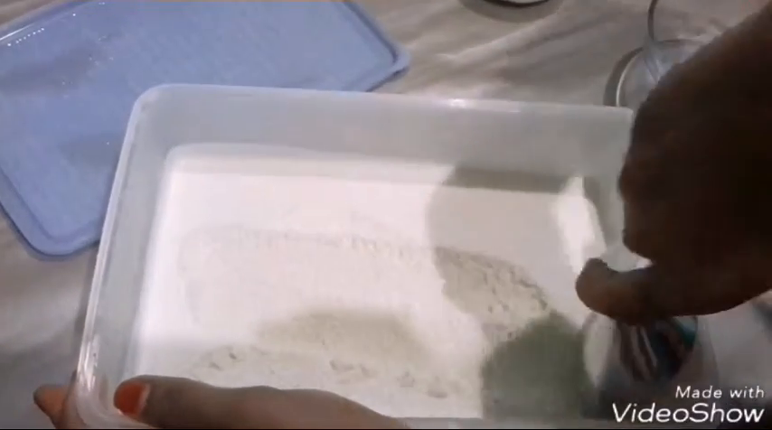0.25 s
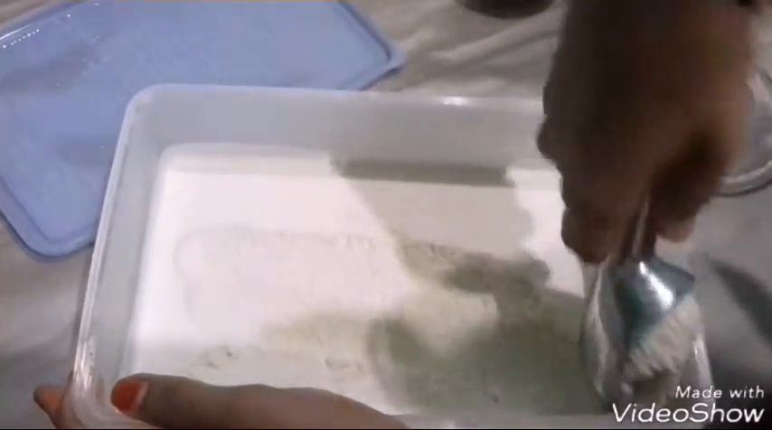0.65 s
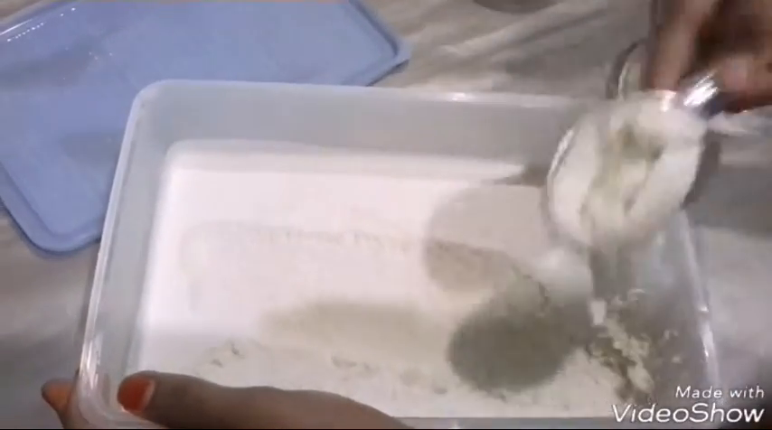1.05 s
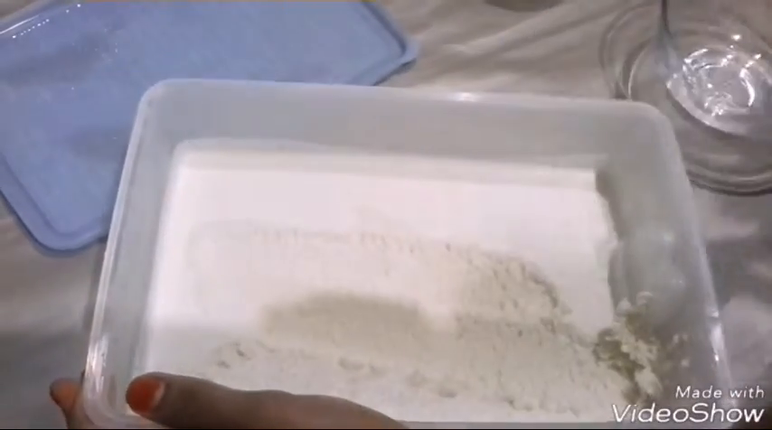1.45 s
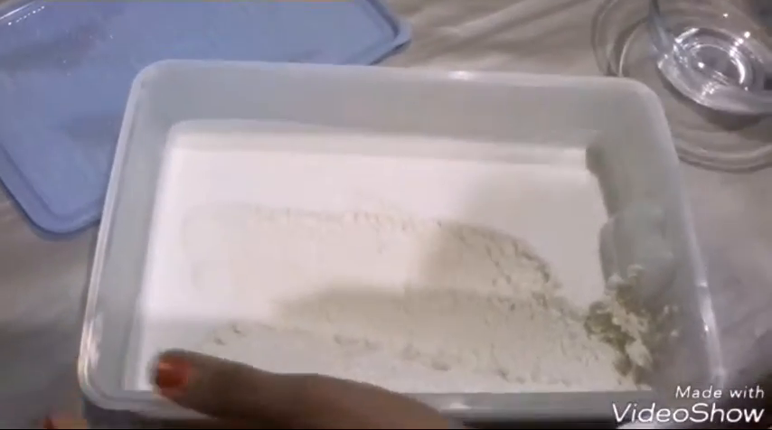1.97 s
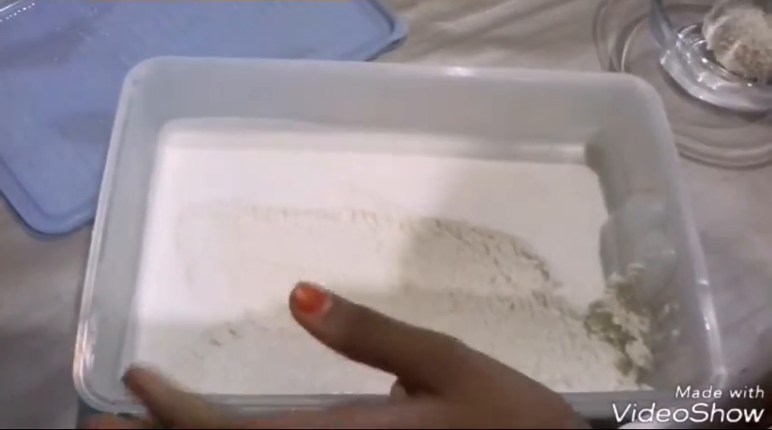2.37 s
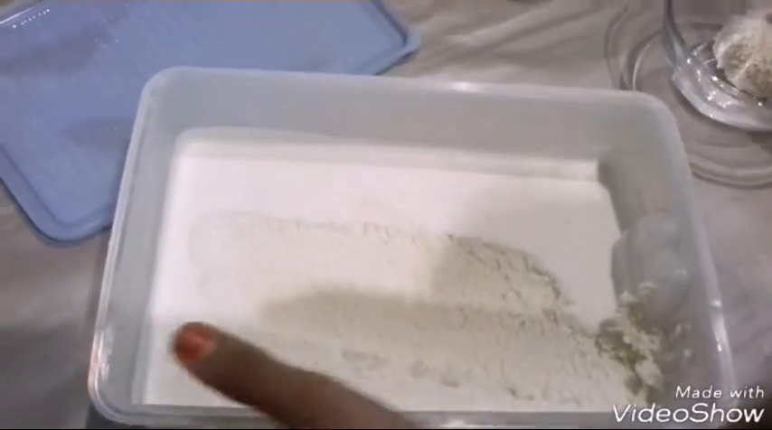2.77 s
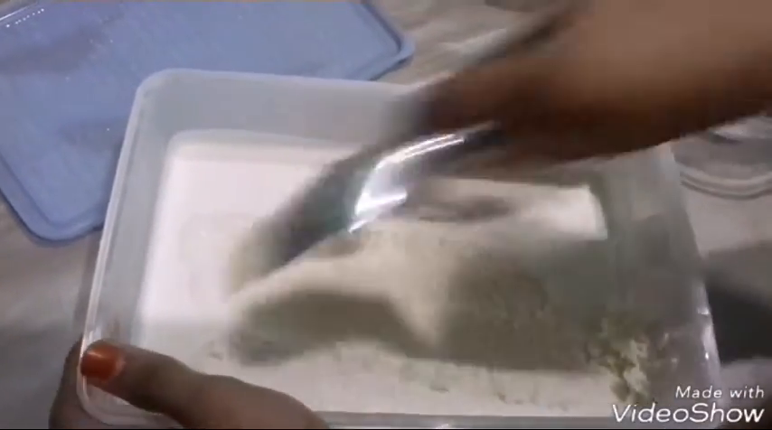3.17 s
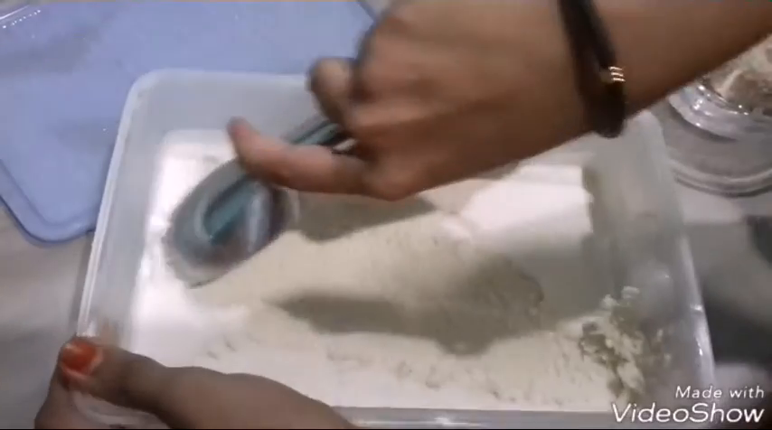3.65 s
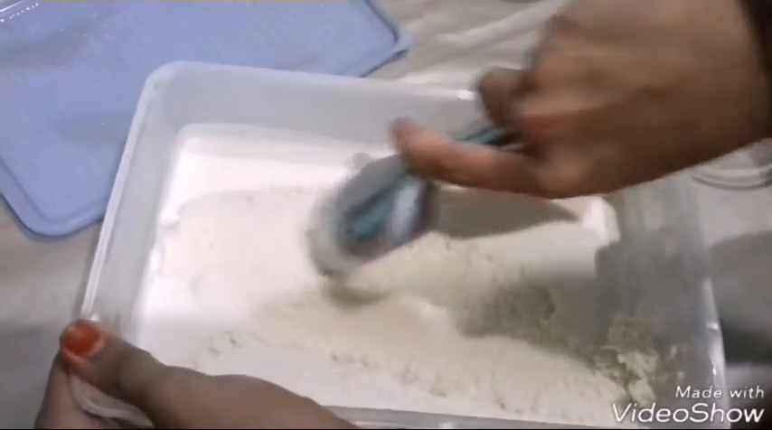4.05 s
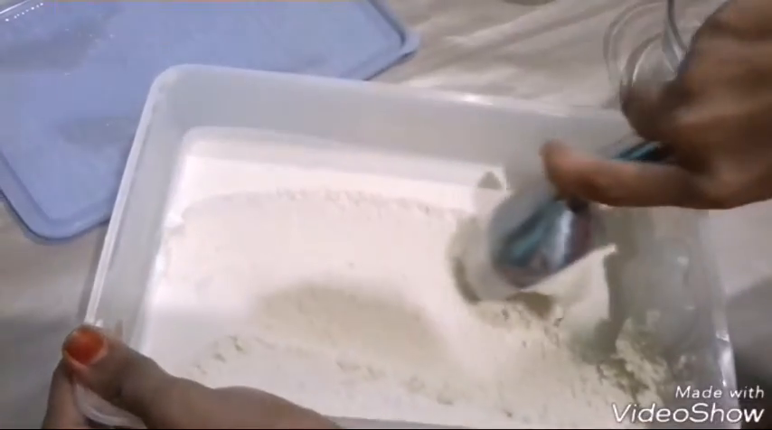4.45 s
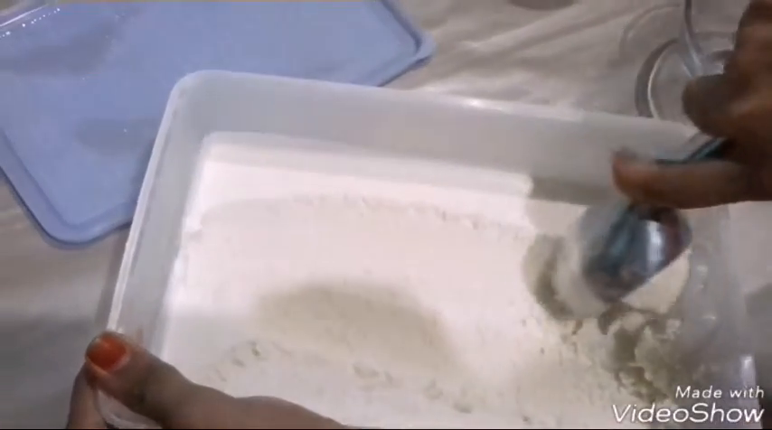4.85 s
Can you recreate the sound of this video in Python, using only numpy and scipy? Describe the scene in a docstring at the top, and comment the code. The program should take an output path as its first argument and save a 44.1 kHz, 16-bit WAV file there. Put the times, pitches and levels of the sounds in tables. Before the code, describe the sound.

Crunchy, hissing scoop strokes and dull plastic knocks, one bright ringing glass clink midway, over room hum and a faint high insect-like trill.

```python
"""A small hard kitchen: a steel scoop drags through frozen ice cream in a plastic tub.
Rough noise shakes resonances of tub and scoop; short pushes knock the tub, and decaying sines ring a glass bowl.
Air hums as coloured noise, and a thin high trill of throbbing sines steps down in threes somewhere far off.
A phone listens with one microphone and holds the loud clink down; its two channels differ only faintly."""
import sys
import numpy as np
from scipy import signal
from scipy.fft import rfft, irfft, next_fast_len
from scipy.io import wavfile
from scipy.ndimage import uniform_filter1d, minimum_filter1d, map_coordinates

SR = 44100
rng = np.random.default_rng(int(sys.argv[2]) if len(sys.argv) > 2 else 0)


def inscribe(sig):
    """Save sig as 16-bit PCM at rate SR to the path in sys.argv[1].

    A 1-D sig is mono; a 2-D sig holds one channel per row.
    Samples are clipped to [-1, 1] before scaling.
    """
    pcm = np.round(np.clip(np.atleast_2d(sig).T, -1, 1) * 32767)
    wavfile.write(sys.argv[1], SR, pcm.astype(np.int16))


def makeup_ratio(level_db):
    """Linear amplitude ratio for a level in decibels (20 dB per factor of ten)."""
    decades = np.asarray(level_db, float) / 20
    return 10 ** decades


N = 225306
T = np.arange(N) / SR

# resonances of the tub floor: (frequency [Hz], width [Hz], level [dB])
TUB_FLOOR = [(150, 37, -9), (234, 42, 1.5), (425, 200, -2)]
TUB_FADE_S = 0.85  # t60 of the tub's swells after their hold


def unit(x):
    """Scales a sound to an rms of one."""
    return x / np.sqrt(np.mean(x ** 2) + 1e-20)


def along(points, hz):
    """Reads (frequency [Hz], value) points on a log frequency axis."""
    f, v = np.transpose(points)
    return np.interp(np.log(hz + 1), np.log(f + 1), v)


def wobble(rate):
    """A smooth random curve with rate knots a second."""
    knots = rng.standard_normal(int(N * rate / SR) + 4)
    return map_coordinates(knots, [T * rate])


def filtered(x, response):
    """Multiplies the spectrum of x by a complex response of frequency."""
    m = next_fast_len(x.shape[-1] + SR // 2)
    spectrum = rfft(x, m) * response(np.fft.rfftfreq(m, 1 / SR))
    return irfft(spectrum, m)[..., :x.shape[-1]]


def modes(table):
    """Causal response of (frequency [Hz], width [Hz], level [dB]) resonances, in alternating polarity."""
    def response(f):
        total = 0
        for k, (centre, width, db) in enumerate(table):
            resonance = 1j * f * width / (centre * centre - f * f + 1j * f * width)
            total = total + (-1) ** k * makeup_ratio(db) * resonance
        return total
    return response


def colour(table):
    """Response of a (frequency [Hz], level [dB]) spectrum."""
    return lambda f: makeup_ratio(along(table, f))


def grit(rough_db):
    """Noise whose strength jumps from crystal to crystal."""
    fine = rough_db * wobble(90)
    coarse = 1.8 * rough_db * wobble(14)
    return rng.standard_normal(N) * makeup_ratio(fine + coarse)


def swells(rows, fade_s):
    """Gain of (start [s], hold [s], level [dB]) events that rise, hold and die away."""
    rise_s = 0.01
    power = 0
    for s, hold, db in rows:
        t = T - s
        rise = np.clip(t / rise_s, 0, 1)
        fade_db = -60 * np.clip(t - rise_s - hold, 0, None) / fade_s
        power = power + (rise * makeup_ratio(db + fade_db)) ** 2
    return np.sqrt(power)


def room(x):
    """The kitchen's answer: a fresh noise tail in which each frequency dies at its own speed."""
    # how long the kitchen rings: (frequency [Hz], t60 [s])
    ring_times = [(200, 0.72), (800, 0.4), (1330, 0.51), (1900, 0.44), (5000, 0.49), (12000, 0.18)]
    hz, t, z = signal.stft(rng.standard_normal(SR // 2 + SR // 4), SR, nperseg=256)
    dying = makeup_ratio(-60 * t / along(ring_times, hz)[:, None])
    tail = signal.istft(z * dying, SR, nperseg=256)[1]
    delayed = np.pad(x, (220, 0))  # 5 ms before the first reflection
    return signal.fftconvolve(delayed, tail / np.linalg.norm(tail))[:len(x)]


def air():
    """Air hums as coloured noise whose level drifts slowly."""
    # spectrum of the hum: (frequency [Hz], level [dB per Hz])
    hum_colour = [(24, -42), (40, 2), (49, -4), (202, 1), (724, -6), (888, -6.5), (1400, -6.5), (1720, -3),
                  (2110, -10), (2590, -3), (4910, -6.5), (7930, -24.5), (9300, -37), (12100, -97),
                  (20500, -120)]
    level_db = -52.5 + 0.81 * wobble(6.0)
    return makeup_ratio(level_db) * unit(filtered(rng.standard_normal(N), colour(hum_colour)))


def trill():
    """Each note sags a little, flutters over the distance, and sits in a hiss of its own band."""
    # three notes of a round: (first start [s], first pitch [Hz], rise per round [Hz], level before flutter [dB])
    triplet = [(-.065, 10512, 8.5, -59.5), (.12, 10322, 20, -59.7), (.34, 10128, 27, -58.2)]
    rounds, round_s, sag_hz_per_s = 8, 0.654, 170
    buzz_hz = 282  # the throb's rate, which adds lines beside each note
    song, blur = np.zeros(N), 0.63 * wobble(30)  # blur: radians of phase wander
    notes = [(s + k * round_s, hz + k * climb_hz, db)
             for k in range(rounds) for s, hz, climb_hz, db in triplet]
    ends = [note[0] for note in notes[1:]] + [triplet[0][0] + rounds * round_s]
    for (s, hz, db), end in zip(notes, ends):
        t = np.clip(T - s, 0, None)
        linger = makeup_ratio(-60 * np.clip(T - end, 0, 1) / 0.21)  # notes fade on after the next begins
        gate = np.clip(t / 0.02, 0, 1) * linger
        phase = 2 * np.pi * (hz * t - sag_hz_per_s / 2 * t ** 2) + blur
        throb = 2 * np.pi * buzz_hz * t
        beside = makeup_ratio(-10) * np.sin(phase + throb) + makeup_ratio(-22) * np.sin(phase - throb)
        song += makeup_ratio(db) * gate * (np.sin(phase) + beside)
    band_colour = [(9000, -27), (9700, -19), (10100, 6.0), (10700, 4.0), (10950, -18), (11200, -54)]
    band = unit(filtered(rng.standard_normal(N), colour(band_colour)))
    flutter = makeup_ratio(-1.5 + 5.3 * wobble(40))
    return flutter * song + makeup_ratio(-9.0) * room(song) + makeup_ratio(-69 + 0.52 * wobble(3.7)) * band


def glass():
    """Each bounce on the bowl adds to its ringing, taps the scoop's handle and cracks into the room."""
    # scoop on glass, and its bounces:
    # (time [s], ring level [dB], crack level [dB], room wash level [dB], handle level [dB])
    clinks = [(2.122, -6, 12, 24.5, 23.5), (2.164, -6, -4, 14.5, 16.5), (2.2, -26, -13, 6, 5)]
    # the bowl's modes, many in close pairs: (frequency [Hz])
    bowl_hz = [1446, 2881, 2910, 2941, 3068, 3106, 4696, 4821, 4855, 4878, 4955, 5495, 7034, 7181, 7206,
               8880, 9913, 10700, 11880, 13043]
    # how each mode rings: (level [dB], t60 [s])
    bowl_rings = [(-16, 0.71), (-5.5, 0.69), (-15.5, 0.35), (-31, .25), (-21, 0.27), (-34, 0.2), (-36, .25),
                  (-3, 0.43), (-14, 0.51), (-17.5, 0.48), (-14.5, 0.43), (-30, 0.16), (-24, 0.23),
                  (-14.5, 0.49), (-20, 0.4), (-41.5, 0.44), (-20, 0.27), (-36, .25), (-36, 0.34),
                  (-32, 0.37)]
    # resonances of the hand-damped scoop: (frequency [Hz], width [Hz], level [dB])
    handle = [(650, 104, -1.5), (970, 210, -3), (1790, 150, 2.5), (3740, 400, -1.5), (5600, 370, 3.5)]
    # spectrum of steel on glass: (frequency [Hz], level [dB per Hz])
    crack_colour = [(150, -53), (300, -20), (500, -14.5), (700, -12), (1300, -1), (1830, -4.5),
                    (2360, -10.5), (3600, -2), (4800, -4), (5600, -8), (7400, -7.5), (8400, -28),
                    (10200, -12.5), (11500, -62)]
    contact_hz = 6000  # the tap is too soft to carry more treble
    ring, crack, blows, taps = np.zeros((4, N))
    for s, ring_db, crack_db, wash_db, handle_db in clinks:
        t = np.clip(T - s, 0, None)
        rise = 1 - np.exp(-t / 0.0023)
        for hz, (db, t60) in zip(bowl_hz, bowl_rings):
            ring += makeup_ratio(ring_db) * rise * makeup_ratio(db - 60 * t / t60) * np.sin(2 * np.pi * hz * t)
        crack += makeup_ratio(crack_db - 60 * t / 0.014) * rise * rng.standard_normal(N)
        blows[round(s * SR)] = makeup_ratio(wash_db)
        taps[round(s * SR)] = makeup_ratio(handle_db)
    echo = makeup_ratio(-24) * room(ring)
    clank = filtered(taps, lambda f: modes(handle)(f) / (1 + 1j * f / contact_hz) ** 3)
    thin_crack = filtered(crack, lambda f: 1j * f / (500 + 1j * f))
    burst = filtered(thin_crack + room(blows), colour(crack_colour))
    return ring + echo + clank + burst * (T >= clinks[0][0])


def knocks():
    """Each short push rings floor, wall and rim of the tub, and the room answers anew."""
    # blows on the tub: (time [s], blow level [dB], contact [ms], floor thud level [dB], wall level [dB])
    blows = [(.137, 21, 0.29, -27, 1), (0.4496, -6, 0.22, -23, 0), (0.72, -4.5, 0.37, -5, 0.5),
             (3.4727, 2.5, 0.5, 7.5, -6), (5.072, 23, .2, -16.5, -7)]
    # resonances of the tub wall: (frequency [Hz], width [Hz], level [dB])
    wall = [(924, 158, -2.5)]
    # resonances of the tub rim: (frequency [Hz], width [Hz], level [dB])
    rim = [(1330, 160, -3.5), (1764, 148, 4.5), (2580, 55, -12), (2850, 150, -13), (3645, 71, -8),
           (4400, 1600, -17.5), (6600, 900, -20.5)]
    # what the corner behind the tub favours: (frequency [Hz], width [Hz], level [dB])
    corner = [(1332, 294, 2.5), (257, 350, -4.5), (3680, 2230, -0.5)]
    out, t = np.zeros(N + SR), np.arange(SR) / SR
    for s, db, ms, thud_db, wall_db in blows:
        push = np.sin(np.pi * np.clip(t * 1000 / ms, 0, 1))

        def body(f):
            return makeup_ratio(thud_db) * modes(TUB_FLOOR)(f) + makeup_ratio(wall_db) * modes(wall)(f) - modes(rim)(f)

        ring = filtered(push / push.sum(), body) * makeup_ratio(db)
        answer = filtered(room(ring), lambda f: abs(modes(corner)(f)))
        out[round(s * SR):][:SR] += ring + makeup_ratio(-0.5) * answer
    return out[:N]


def squeak():
    """The steel squeaks thinly and flares twice: a sine of wavering, climbing pitch."""
    # the squeak and its flares: (start [s], hold [s], level before flicker [dB])
    flares = [(.745, .14, -50), (.772, .015, -46), (.868, .015, -51)]
    climb_hz = 350 * np.clip(T - flares[0][0], 0, 1)  # 350 Hz per second
    hz = 3665 + climb_hz + 30 * wobble(41)
    flicker = makeup_ratio(3.1 * wobble(71.6))
    return swells(flares, fade_s=0.08) * flicker * np.sin(2 * np.pi * np.cumsum(hz) / SR)


def rubbed(rough_db, response):
    """Gritty friction noise shakes a body, here at an rms of one."""
    return unit(filtered(grit(rough_db), response))


def twice(table):
    """Response of resonances passed through twice, for steeper skirts."""
    return lambda f: modes(table)(f) ** 2


def answering(press, answer_db, rows, fade_s):
    """A body's level: answer_db relative to the hiss, joined in power by its own swells."""
    return np.hypot(makeup_ratio(answer_db) * press, swells(rows, fade_s))


def floor_rumble():
    """The tub floor rumbles under rough noise."""
    # rumbles: (start [s], hold [s], level [dB])
    rumbles = [(4.1, .16, -60), (4.33, 0.095, -59.5)]
    return swells(rumbles, TUB_FADE_S) * rubbed(2.5, modes(TUB_FLOOR))


def swish():
    """The full scoop slides up the wall, and its loaded cup resonates."""
    # the slide: (start [s], hold [s], level [dB])
    slides = [(.875, 0.2, -50)]
    # resonances of the cup when full: (frequency [Hz], width [Hz], level [dB])
    full_cup = [(1606, 75, 1.5), (1860, 150, 0)]
    return swells(slides, fade_s=0.58) * rubbed(0.2, twice(full_cup))


def wall_boom(press):
    """The tub walls boom under rubbing."""
    # resonances of the rubbed walls: (frequency [Hz], width [Hz], level [dB])
    walls = [(782, 520, 1), (1092, 320, 2)]
    # moments when the walls ring up above the hiss: (start [s], hold [s], level [dB])
    surges = [(0.701, 0.093, -54), (.82, 0.034, -54), (1.663, .03, -60), (3.592, 0.027, -58.5),
              (4.19, 0.1, -64)]
    return answering(press, -12.5, surges, TUB_FADE_S) * rubbed(1.5, twice(walls))


def hollow_cup(press):
    """The scoop's cup colours the scrape with its hollow resonances."""
    # resonances of the cup: (frequency [Hz], width [Hz], level [dB])
    hollow = [(1787, 325, 0.5), (1180, 206, -2.5)]
    # moments when the cup rings up above the hiss: (start [s], hold [s], level [dB])
    surges = [(1.34, 0.04, -61), (3.64, .02, -67), (3.76, .05, -58), (4.06, .03, -58), (4.2, 0.044, -48.5),
              (4.42, 0.077, -52.5)]
    return answering(press, -5, surges, fade_s=0.68) * rubbed(1.3, twice(hollow))


def scoop_edge(press):
    """The scoop's edge resonates as it cuts."""
    # resonance of the edge: (frequency [Hz], width [Hz], level [dB])
    blade = [(2606, 330, 0)]
    # moments when the edge rings up above the hiss: (start [s], hold [s], level [dB])
    surges = [(2.84, .03, -61), (3.77, 0.1, -53.5), (4.06, .04, -60), (4.2, 0.069, -54), (4.4, .06, -57)]
    return answering(press, -8.5, surges, fade_s=1) * rubbed(-1.8, twice(blade))


def crystal_rasp(press):
    """Fine crystals rasp in a high band whose top is rolled off."""
    # where fine crystals ring: (frequency [Hz], width [Hz], level [dB])
    crystals = [(5120, 950, 0)]
    # moments when the crystals ring up above the hiss: (start [s], hold [s], level [dB])
    surges = [(.83, 0.087, -60), (2.8, 0.17, -58), (3.19, 0.023, -62), (4.22, 0.048, -50),
              (4.4, .08, -54.5)]
    noise = rubbed(1.8, lambda f: modes(crystals)(f) ** 2 / (1 + (f / 9000) ** 12))
    return answering(press, -6.5, surges, fade_s=0.54) * noise


def frost_hiss(press):
    """Breaking frost hisses as gritty coloured noise that follows the pressure."""
    # spectrum of breaking frost: (frequency [Hz], level [dB per Hz])
    frost = [(1180, -27), (2000, -9), (2160, -5), (2570, -8), (3240, 0.5), (4860, -2.5), (7280, -19),
             (9300, -22), (12100, -37.5), (20500, -120)]
    return press * rubbed(1.47, colour(frost))


def pressure():
    """How hard the scoop presses into the frost, as the gain of the hiss."""
    # pressure over time: (time [s], hiss level [dB])
    strokes = [(0, -49.5), (.09, -52.5), (.45, -59), (.66, -56.5), (.75, -56), (.83, -52.5), (.845, -48),
               (.95, -46.5), (1.07, -51.5), (1.2, -64), (1.31, -60.5), (1.35, -47.5), (1.5, -54.5),
               (1.65, -55.5), (1.71, -52.5), (2.0, -57), (2.1, -60), (2.72, -60.5), (2.9, -61.5),
               (3.15, -88), (3.42, -63), (3.5, -55), (4.0, -53.5), (4.09, -49.5), (4.35, -49.5),
               (4.45, -47), (4.6, -56), (4.79, -54.5), (4.86, -51), (5.03, -49)]
    s, db = np.transpose(strokes)
    return makeup_ratio(np.interp(T, s, db))


def rubbing():
    """Breaking frost shakes the tub and the scoop, and hisses; the steel squeaks."""
    press = pressure()
    tub = floor_rumble() + wall_boom(press)
    scoop = swish() + hollow_cup(press) + scoop_edge(press) + squeak()
    return tub + scoop + frost_hiss(press) + crystal_rasp(press)


def scene():
    """Sums all sources into two equal channels."""
    return np.tile(air() + trill() + glass() + knocks() + rubbing(), (2, 1))


def roll_off(x):
    """The treble ends steeply here."""
    return signal.sosfilt(signal.butter(12, 15420, fs=SR, output="sos"), x)


def record(dry):
    """A limiter holds peaks under its ceiling, the bass is cut, and the channels differ faintly."""
    # spectrum of the hiss that differs between channels: (frequency [Hz], level [dB per Hz])
    apart = [(24, -30), (40, -6), (246, -2.5), (727, -5), (899, -5.5), (2990, -7.5), (5390, -9),
             (9060, -15), (10400, -10.5), (11200, -18), (14600, -47), (22000, -120)]
    need = np.minimum(1, makeup_ratio(-4.5) / (np.abs(dry[0]) + 1e-9))
    # look ahead and hold, then smooth (window sizes in samples)
    gain = uniform_filter1d(minimum_filter1d(need, size=1100), size=900)
    held = filtered(dry * gain, lambda f: (1j * f / (50 + 1j * f)) ** 2)
    hiss = makeup_ratio(-70) * unit(filtered(rng.standard_normal(N), colour(apart)))
    side = hiss + makeup_ratio(-47) * room(held[0])
    mix = held + [side, -side]
    return roll_off(mix)


dry = scene()
out = record(dry)
inscribe(out)
```